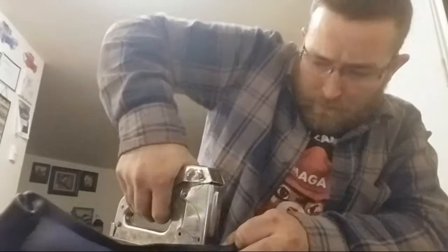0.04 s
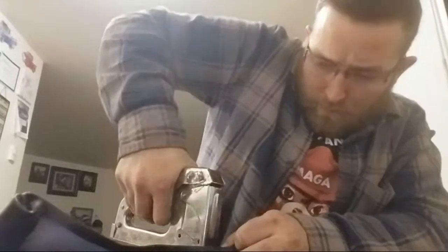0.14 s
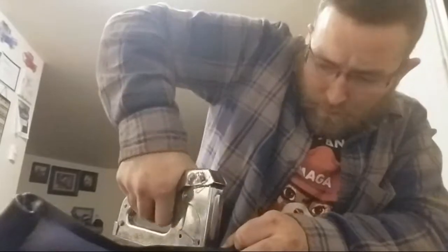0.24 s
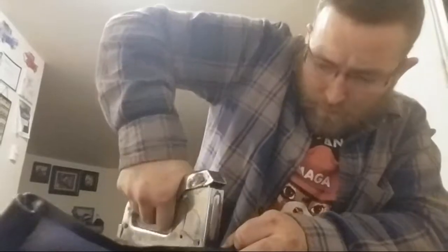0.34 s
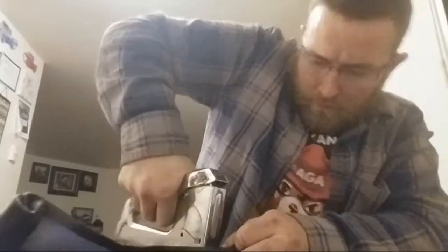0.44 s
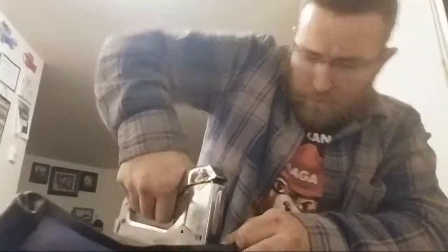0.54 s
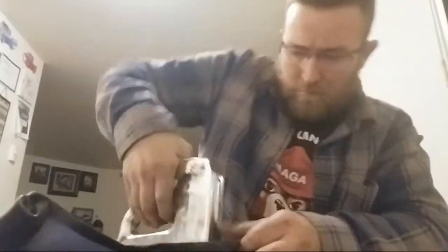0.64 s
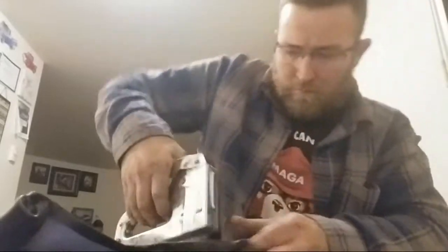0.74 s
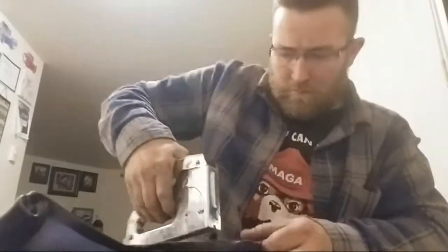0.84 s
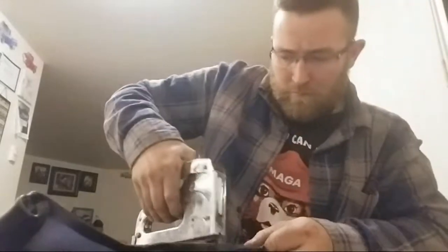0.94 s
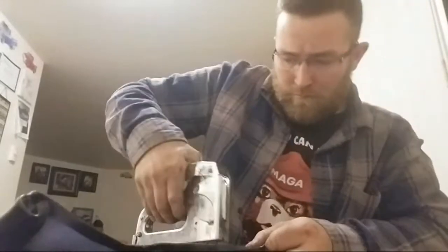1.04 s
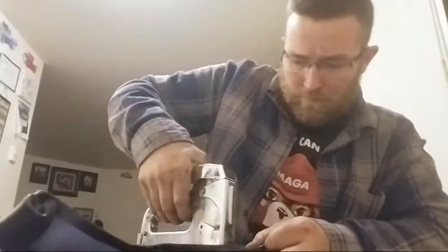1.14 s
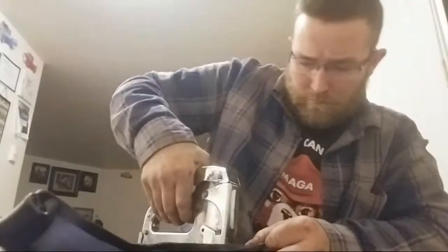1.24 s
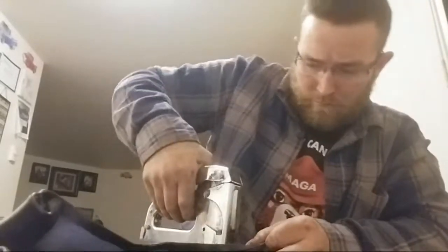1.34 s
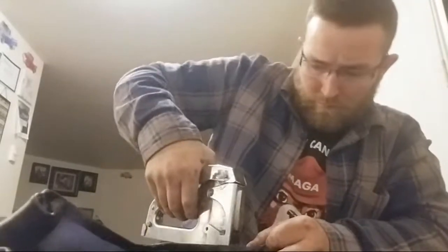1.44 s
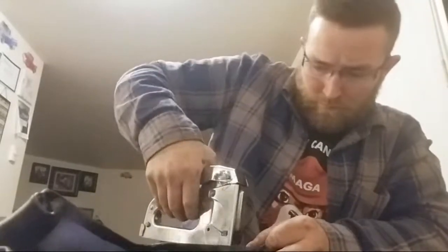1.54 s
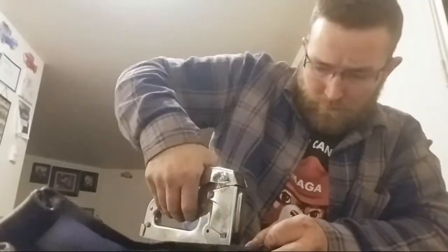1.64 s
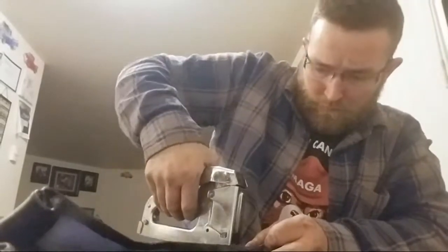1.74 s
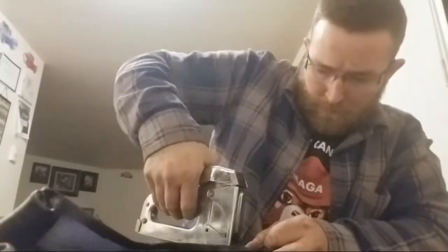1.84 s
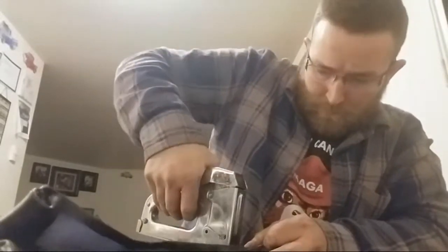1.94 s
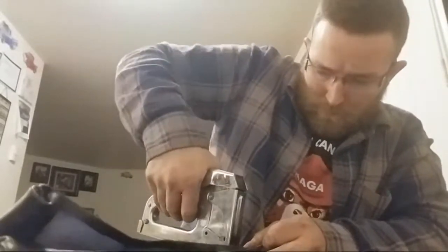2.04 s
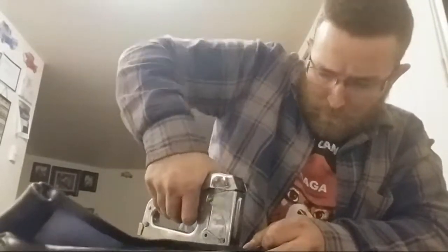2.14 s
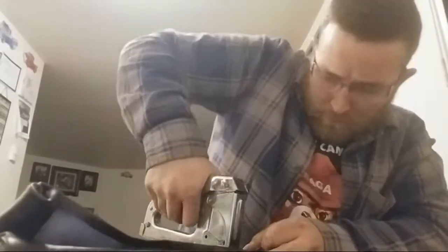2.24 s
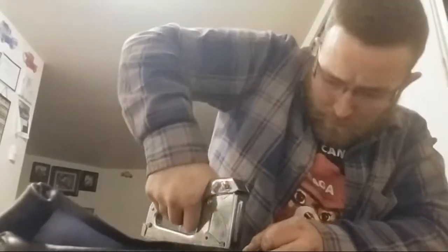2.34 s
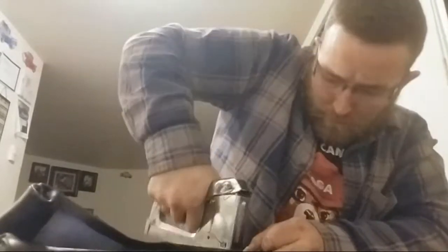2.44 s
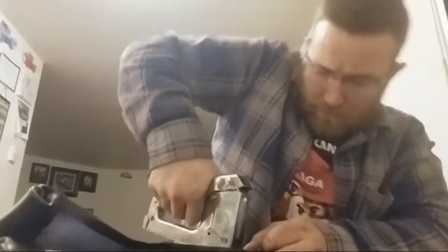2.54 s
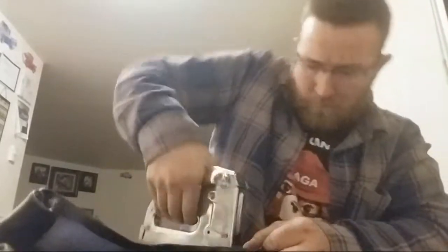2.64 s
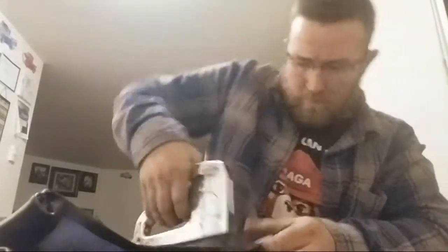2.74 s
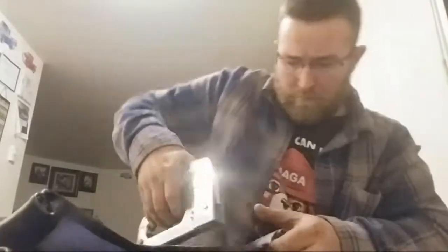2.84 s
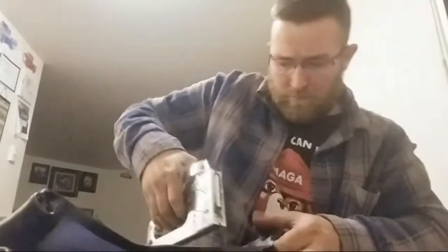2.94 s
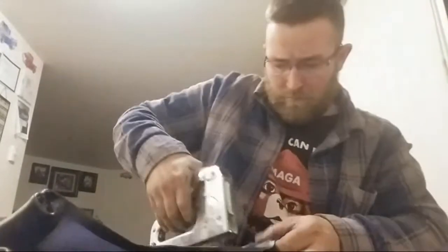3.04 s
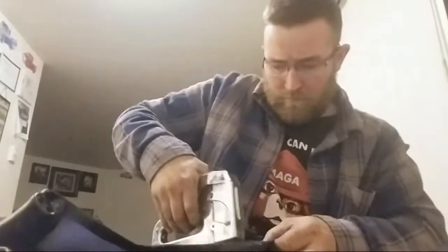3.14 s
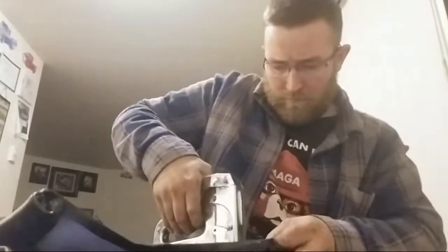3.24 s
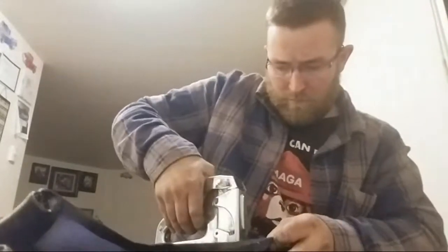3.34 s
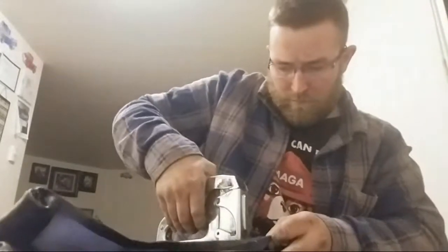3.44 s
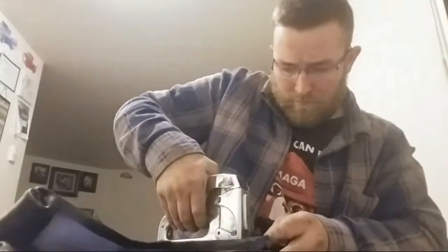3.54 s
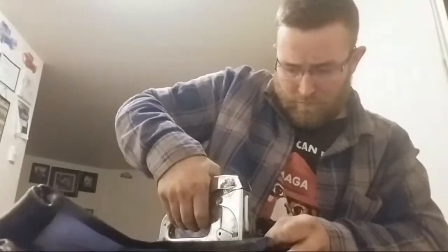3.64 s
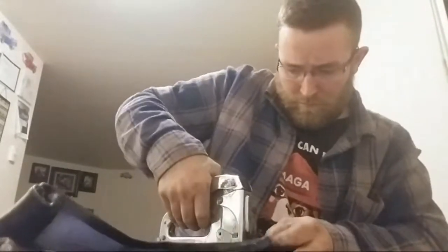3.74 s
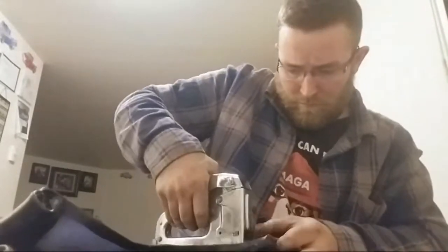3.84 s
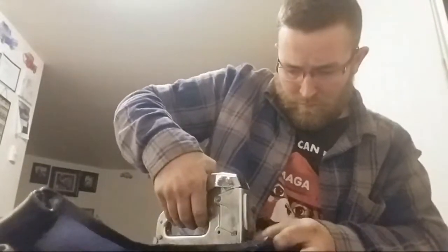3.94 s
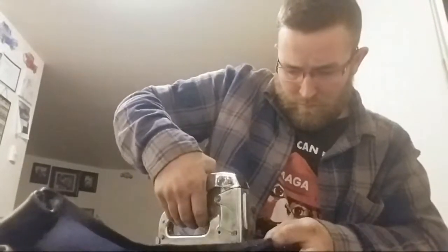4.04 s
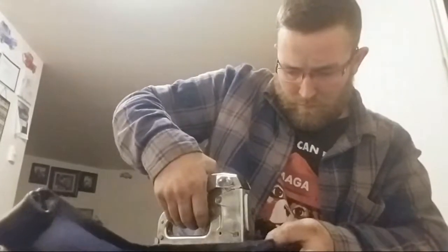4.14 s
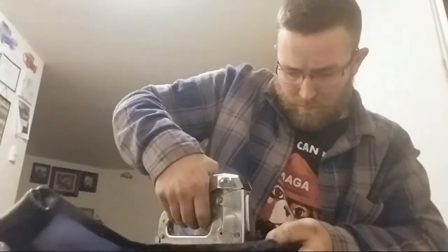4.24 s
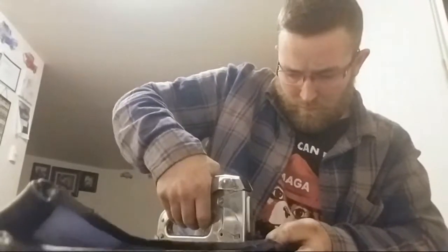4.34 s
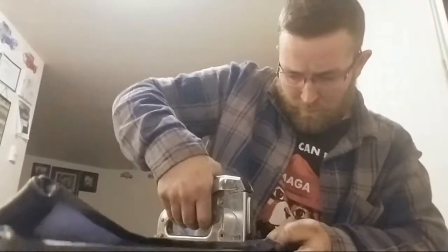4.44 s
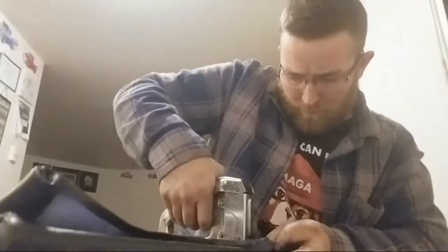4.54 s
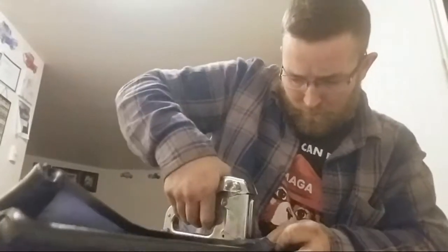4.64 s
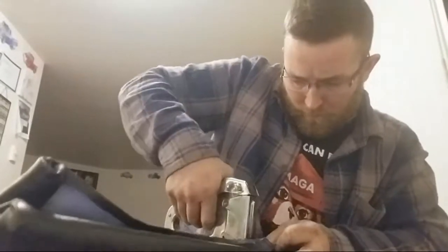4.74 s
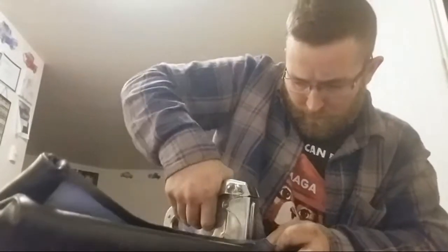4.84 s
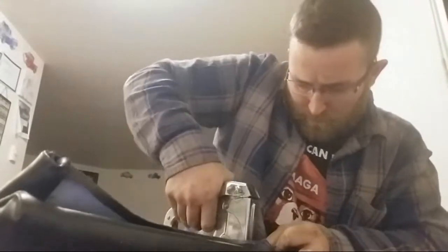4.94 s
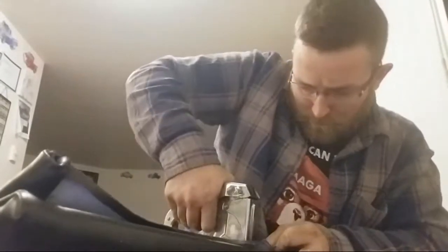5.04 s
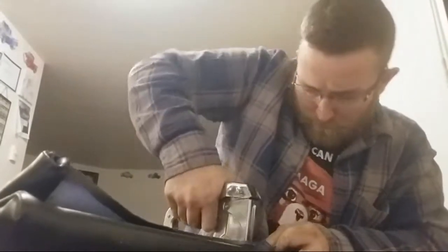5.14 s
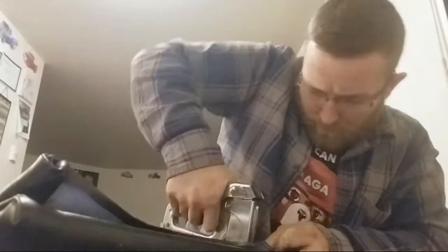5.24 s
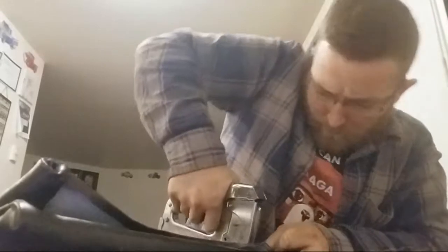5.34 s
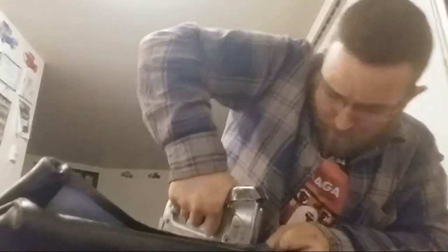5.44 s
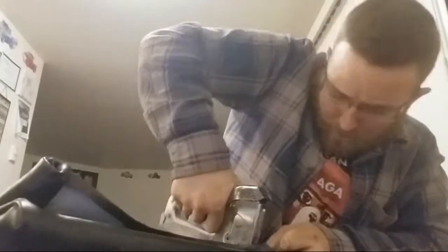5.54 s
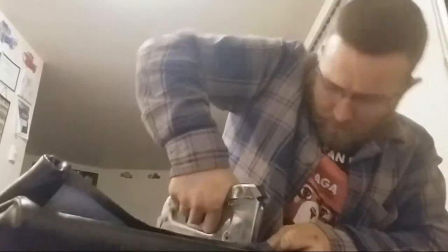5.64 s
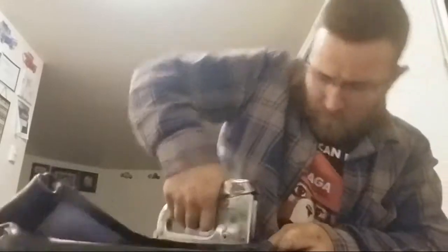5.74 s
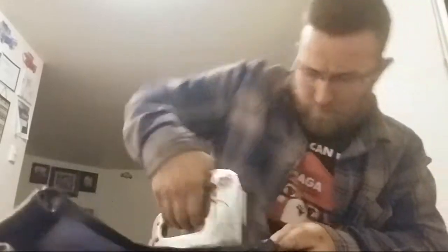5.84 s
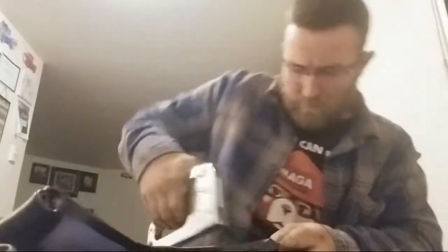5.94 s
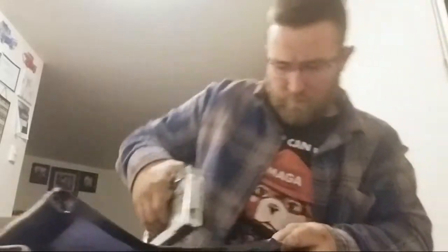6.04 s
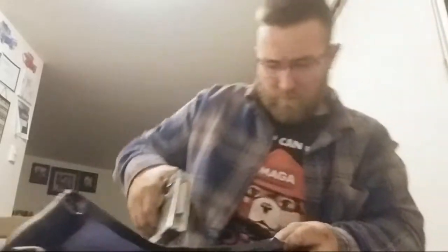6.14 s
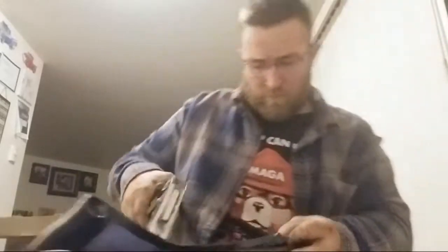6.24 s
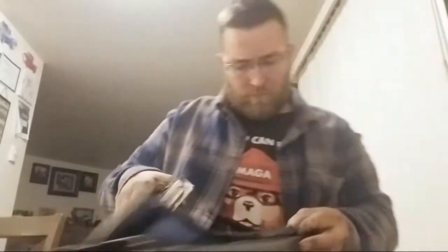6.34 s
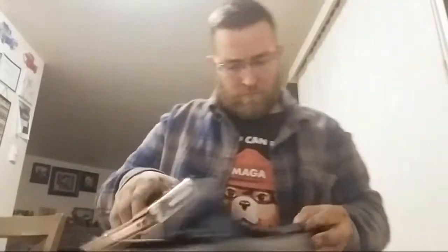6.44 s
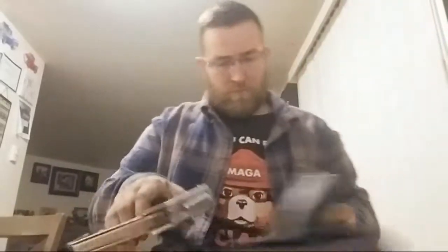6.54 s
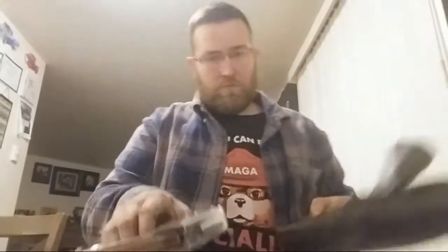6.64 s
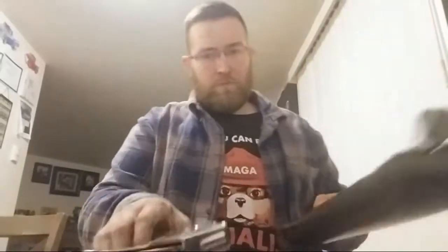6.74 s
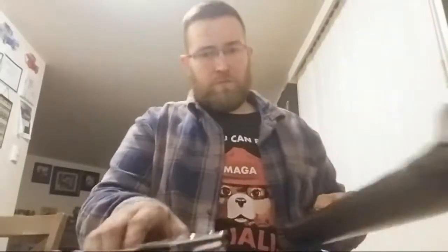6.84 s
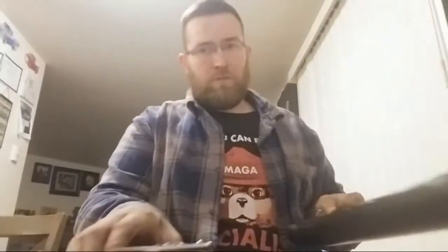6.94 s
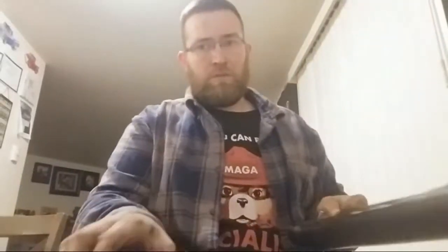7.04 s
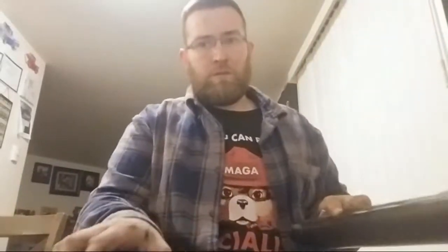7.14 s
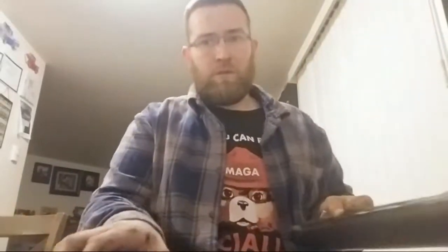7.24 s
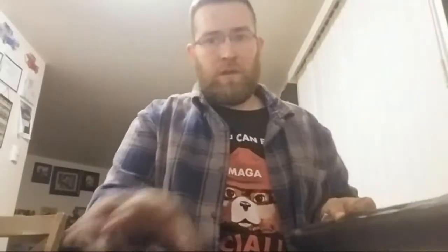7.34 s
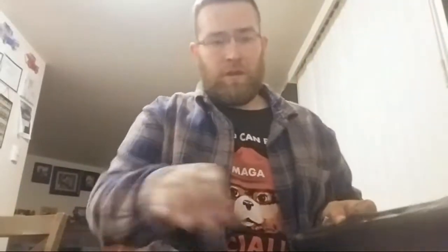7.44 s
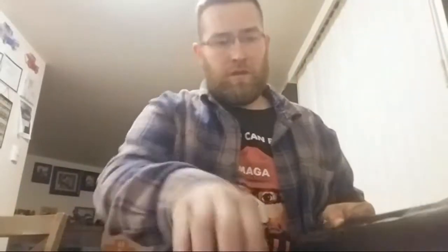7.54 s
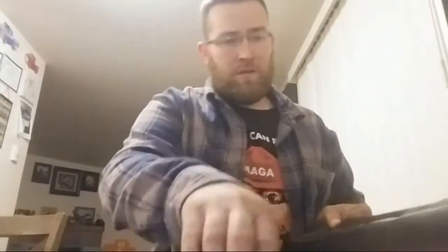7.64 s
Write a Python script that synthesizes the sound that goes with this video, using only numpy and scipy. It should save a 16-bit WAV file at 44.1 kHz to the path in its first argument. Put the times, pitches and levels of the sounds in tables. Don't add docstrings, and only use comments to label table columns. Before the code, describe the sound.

In a small hard room, close to a phone microphone, cloth scrapes briefly, then a staple gun clicks and slams into a board. Its lever springs back with faint clicks. Two more shots follow at intervals, with rustles and faint ticks between. Finally the metal tool lands on a table with hard knocks, then soft rubbing.

```python
import sys
import numpy as np
from scipy import signal
from scipy.io import wavfile
from scipy.ndimage import uniform_filter1d, minimum_filter1d

SR = 44100
rng = np.random.default_rng(int(sys.argv[2]) if len(sys.argv) > 2 else 0)


def persist_wave(psi):
    counts = np.round(np.clip(psi, -1, 1) * 32767).astype(np.int16)
    wavfile.write(sys.argv[1], SR, np.atleast_2d(counts).T)


def attenuation_scalar(level_db):
    decades = np.asarray(level_db, float) / 20
    return 10 ** decades


N = 338850
TREBLE_HZ = 8000

# (time [s], room level [dB], board level [dB], rattle [s], favoured pitch [Hz])
BLOWS = [
    (0.339, -6, -8.5, 0.02, 909.5),
    (2.3723, -7.5, -9, 0.012, 722.5),
    (5.4596, -7.5, -8.5, 0.018, 580),
]
# (frequency [Hz], level [dB], t60 [s])
BOARD = [(115, 0, .26), (147, -7, 0.3), (215.5, -8.5, 0.22), (321, -2, 0.2), (378, -3.5, 0.2),
         (497, -7, .2), (563, -2, 0.18), (616, -3, 0.16), (726, -6, .18), (772, -2.5, 0.17), (856, -5, .15),
         (1203, -11, 0.2), (1840, -7, 0.13), (3050, -17.5, 0.054)]
# (frequency [Hz], level [dB per Hz])
BLOW_COLOUR = [(24, -52), (40, -17), (137, -9.5), (180, -15), (337, -7.5), (896, -14.5), (965, -13.5),
               (1810, -15), (2770, -16), (9940, -20.5), (16000, -18)]


def blows():
    out = np.zeros(N)
    slam_db, treble_db = 9, -11.5
    for s, room_db, board_db, rattle_s, spot_hz in BLOWS:
        driver = [(370.4, -6, .02), (spot_hz, 1.5, 0.015), (1380, -7, .02), (4040, -11.5, 0.0039)]
        add(out, s, attenuation_scalar(slam_db) * ring(driver, 0.022, 0.94, rise_s=.003))
        add(out, s, attenuation_scalar(slam_db - 6) * ring(STEEL, 0.033, 3.7, rise_s=.003))

        struck = favour(BOARD, spot_hz, lift_db=4.0)
        board = ring(struck, 5 * rattle_s, -8.5, rise_s=0.011, rough=0.65, count=18000)
        add(out, s, attenuation_scalar(board_db) * board)

        tail = echo(BLOW_COLOUR, treble_db, shorter=0.72, hold_s=rattle_s, count=440)
        add(out, s, attenuation_scalar(room_db - 0.5) * tail)

        shake = echo(BLOW_COLOUR, -60, shorter=0.87, rise_s=0.82 * rattle_s, hold_s=0.47 * rattle_s, count=440)
        shaken = favour(BOARD, spot_hz, lift_db=7.0)
        rattle = sum(attenuation_scalar(db) * resonate(shake, hz, 39) for hz, db, _ in shaken)
        add(out, s, attenuation_scalar(board_db + 5.0) * rattle)
    return out


# (time [s], peak level [dB], favoured pitch [Hz])
LATCH = [
    (0.306, -7, 990),
    (2.343, -7, 976),
    (5.415, -7, 2310),
    (5.4238, -14.5, 1250),
]
# (frequency [Hz], level [dB], t60 [s])
LATCH_MODES = [(850, -2, .015), (1150, 0, .016), (1500, -2, .012), (1950, -1, .016), (2450, -1, .018),
               (2900, -2, .015), (3500, -6, .01), (4300, -8, .01), (6500, -16, .008)]


def latch_slips():
    treble_db, room_db = -10, -21.5
    events = [(s, db, treble_db, room_db, hz) for s, db, hz in LATCH]
    return steel(events, LATCH_MODES, 0.0045, 0.0086, -16, -2.0)


# (time [s], peak level [dB], treble [dB], room [dB], favoured pitch [Hz])
LEVER = [(0.628, -32.5, -1.5, -10, 3050), (0.649, -28, -9.5, -16.5, 1760), (0.659, -30.5, 5, -32, 3030),
         (2.651, -37, -2, -11.5, 1770), (2.678, -29.5, 3.5, -14.5, 3120),
         (2.687, -32.5, -10.5, -20.5, 3260), (3.684, -40.5, -7, -18, 3140), (4.25, -40, -3, -33, 2950),
         (5.807, -37, -27, -13, 3140), (5.815, -50, 13, -21, 1110), (5.83, -23, 0.5, -19.5, 3080),
         (5.849, -44, 0, -15, 1094), (7.075, -12, -6, -31, 1160), (7.093, -24.5, -1, -38, 1100)]
# (frequency [Hz], level [dB], t60 [s])
LEVER_MODES = [(1250, 2, .035), (1500, -3, .02), (2100, -10, .02), (2750, -5, .012), (3150, 0, .02),
               (3400, -5, .012), (4400, -12, .02), (6200, -16, .015)]


def lever_clicks():
    return steel(LEVER, LEVER_MODES, 0.037, 0.029, -22, -2.0)


# (frequency [Hz], level [dB], t60 [s])
STEEL = [(8650, 0, .03), (9900, -4, .012), (11450, 0, .025), (13000, -4, .012), (15100, -2, .018)]
# (frequency [Hz], level [dB per Hz])
STEEL_ECHO = [(100, -24), (600, -3.5), (1500, -4), (4000, -10), (7000, -15)]


def steel(events, modes, crack_s, treble_crack_s, creep_db, echo_treble_db):
    out = np.zeros(N)
    no_thump = signal.butter(4, 720, "high", fs=SR, output="sos")
    for s, db, treble_db, room_db, spot_hz in events:
        add(out, s - .005, attenuation_scalar(db + creep_db) * ring(modes, 0.01, 2.4, rise_s=0.0065))
        body = ring(favour(modes, spot_hz, lift_db=9), crack_s, -1.8)
        add(out, s, attenuation_scalar(db + 1) * signal.sosfilt(no_thump, body))
        add(out, s, attenuation_scalar(db + treble_db + 7.0) * ring(STEEL, treble_crack_s, 5.6))
        tail = attenuation_scalar(db + room_db) * echo(STEEL_ECHO, treble_db + echo_treble_db, shorter=.7)
        plates = resonate(tail, 8650, 300) + .7 * resonate(tail, 11450, 400)
        add(out, s, tail + attenuation_scalar(3.0) * plates)
    return out


# (time [s], peak level [dB], contact pitch [Hz], thump level [dB], thump pitch [Hz])
KNOCKS = [
    (3.762, -41, 880, -19.5, 332),
    (5.699, -30, 1830, -12, 551),
    (7.07, -2.5, 1790, -31.5, 501),
    (7.088, -20.5, 1040, -6, 142.4),
    (7.149, -15.5, 1220, -21, 220),
    (7.268, -7, 1120, -16, 309),
]


def table_knocks():
    return knocks(KNOCKS, 0.00013, 0.011, -21.5)


# (time [s], peak level [dB], contact pitch [Hz], thump level [dB], thump pitch [Hz])
BUMPS = [(0.68, -45, 590, -13.5, 135), (5.85, -65, 396, 3, 153), (0.81, -44.5, 604, -16, 146),
         (0.934, -55.5, 576, -15, 161), (4.962, -46, 520, -30, 320), (5.322, -29.5, 1020, -19, 130),
         (6.894, -48.5, 412.3, -6.5, 265.4), (7.007, -45.5, 755, -10, 255), (7.562, -32, 550, -16, 148),
         (7.604, -41.5, 580, -4, 130)]


def soft_bumps():
    return knocks(BUMPS, 0.0074, 0.1, -13)


# (time [s], peak level [dB], thump pitch [Hz])
TICKS = [(1.1011, -50.5, 805), (1.3584, -66, 386), (1.4731, -58.5, 309), (1.5648, -57, 340),
         (1.5968, -48.5, 321), (1.956, -46, 311), (2.235, -44.5, 958), (2.2576, -47, 818),
         (2.2757, -47.5, 883), (3.6253, -55.5, 970)]


def nose_ticks():
    contact_hz, thump_db = 2240, -19.5
    events = [(s, db, contact_hz, thump_db, hz) for s, db, hz in TICKS]
    return knocks(events, 0.0008, 0.0061, -19.5)


# (frequency [Hz], level [dB per Hz])
WOOD_ECHO = [(50, -21.5), (130, 0), (400, -4.5), (1000, -9.5), (2500, -22.5), (7000, -44)]


def knocks(events, rise_s, contact_s, room_db):
    out = np.zeros(N)
    for s, db, hz, thump_db, low_hz in events:
        tick_modes = [(hz * 0.5, -3, .02), (hz, 0, .018), (hz * 1.2, -3, .015), (hz * 1.8, -7, .011)]
        dull = signal.butter(2, hz * 2.0, fs=SR, output="sos")
        tick = signal.sosfilt(dull, ring(tick_modes, contact_s, 0.3, rise_s))
        add(out, s, attenuation_scalar(db + 3.0) * tick)

        wood_modes = [(low_hz * .5, -9, .25), (low_hz, 0, .15), (low_hz * 2.0, -4, .06)]
        thump = ring(wood_modes, contact_s, -15.5, rise_s, rough=0.19, count=12000)
        add(out, s, attenuation_scalar(db + thump_db + 13) * thump)

        add(out, s, attenuation_scalar(db + room_db) * echo(WOOD_ECHO, -34.5, shorter=0.84, rise_s=0.0043))
    return out


# (time [s], length [s], level [dB], resonance [Hz])
DRAGS = [(0.076, 0.081, -35.5, 1040), (1.199, 0.097, -61, 1680), (1.889, 0.049, -39, 1000),
         (2.1, 0.17, -47, 876), (3.799, 0.086, -40, 1030), (4.359, 0.14, -32, 1100),
         (4.683, 0.13, -32, 1130), (4.939, 0.08, -40, 1060), (6.628, 0.14, -53, 1150),
         (6.9, .07, -44.5, 4470), (7.355, 0.028, -35.5, 4950), (7.47, 0.14, -31, 2664),
         (7.591, 0.11, -40, 2720), (7.62, 0.09, -36, 1510)]
# (ratio [1], level [dB])
DRAG_OVERTONES = [(1, -17.5), (2.25, -39), (3.4, -28.5)]


def drags():
    out = np.zeros(N)
    for s, long, db, hz in DRAGS:
        grit = rng.standard_normal(SR // 3) * attenuation_scalar(0.76 * drift(SR // 3, 200))
        sound = 0
        for ratio, overtone_db in DRAG_OVERTONES:
            if hz * ratio < TREBLE_HZ:
                hollow = resonate(resonate(grit, hz * ratio, 250), hz * ratio, 250)
                sound = sound + attenuation_scalar(overtone_db) * evened(hollow)
        count = round(long * SR)
        add(out, s, attenuation_scalar(db) * sound[:count] * signal.windows.tukey(count, .6))
    return out


# (time [s], length [s], level [dB])
SPRING = [
    (.95, .2, -71),
    (2.749, 0.46, -51.5),
    (5.9, 0.49, -57),
]


def spring_whistle():
    out = np.zeros(N)
    for s, long, db in SPRING:
        u = np.arange(round(long * SR)) / (long * SR)
        pitch_hz = 4350 + 14 * drift(SR, 300)
        whistle = np.sin(2 * np.pi * np.cumsum(pitch_hz) / SR)[:len(u)]
        whistle = whistle * attenuation_scalar(2.6 * drift(len(u), 900))
        swell = np.minimum(u / .11, 1) ** 2 * np.minimum((1 - u) / .4, 1)
        add(out, s, attenuation_scalar(db - 30 * u ** .5) * swell * whistle)
    return out


# (frequency [Hz], level [dB per Hz])
HUM_COLOUR = [(24, -60.5), (40, -17), (159, -5), (262, -8), (320, -3.5), (646, -5), (1040, -6), (1480, -14),
              (4570, -13.5), (7730, -27), (9220, -22.5), (14800, -26.5), (16000, -31.5)]
# (frequency [Hz], width [Hz], level [dB])
HUM_PEAKS = [(74, 32, -15.5), (330.6, 12, -5), (480, 30, -12.5), (1030, 82, -7.5), (1720, 140, -9.5)]


def hum():
    hz, t = np.fft.rfftfreq(1024, 1 / SR), np.arange(N // 256 + 5) * 256 / SR
    colour = read(HUM_COLOUR, hz)
    band = np.digitize(hz, [1500, TREBLE_HZ])
    band_db = [10 * np.log10(np.sum(attenuation_scalar(2 * colour[band == k]))) for k in range(3)]
    colour -= np.array(band_db)[band]
    levels = hum_levels(t)
    level = uniform_filter1d(levels[band], 9, axis=0)
    level = level + (band == 2)[:, None] * rustle(t)
    patch_db = np.where(band < 2, 2.1, 1.3)[:, None]
    field = colour[:, None] + level + patch_db * drift(level.shape, 8, 8) + 0.99 * drift(len(t), 3)
    flat = noise(0 * field[:, :200], count=40000)
    air = noise(field, count=N) / np.std(flat) * np.sqrt(len(hz))
    low_db = np.interp(np.arange(N) / SR, t, levels[0])
    for f, width, db in HUM_PEAKS:
        wander_hz = f * (1 + 0.0052 * drift(N, 6000))
        tone = evened(resonate(rng.standard_normal(N), wander_hz, width))
        air = air + tone * attenuation_scalar(db + low_db + 0.4 * drift(N, 3000))
    return air


# (open level [dB], ducked by [dB], share of handling [1])
HUM_RANGES = [
    (-54, 20.3, 0.96),
    (-59, 18.5, 0.56),
    (-60.5, 20, .4),
]
# (time [s], lift [dB])
HANDLING = [(0.0, -0.5), (1.7, 4), (2.2, 1.5), (3.2, 1.8), (3.95, 7), (4.25, 1.8), (4.65, 3), (5.2, 0.2),
            (6.0, 2.8), (6.3, 4.7), (6.5, 0), (7.0, 4.8), (7.22, 6.5), (7.4, 3), (7.68, 5.5)]


def hum_levels(t):
    fall_s, hold_s, recover_s = 0.22, 1.129, 0.31
    since = t - np.array(BLOWS)[:, :1]
    sink = 1 - np.exp(-(np.maximum(since, 0) / (2 * fall_s)) ** 3)
    recovery = np.exp(-np.maximum(since - hold_s, 0) / recover_s)
    ducked = (sink * recovery).max(0)
    lift = np.interp(t, *np.transpose(HANDLING))
    return np.array([open_db - duck_db * ducked + share * lift for open_db, duck_db, share in HUM_RANGES])


# (time [s], length [s], lift [dB])
RUSTLES = [
    (1.5, 0.12, 4.5),
    (2.06, .2, 2),
    (6.19, 0.1, 9),
    (6.39, 0.065, 10),
    (7.21, 0.06, 7.5),
    (7.255, 0.065, 6),
]


def rustle(t):
    lifts = 0
    for s, long, db in RUSTLES:
        lifts = lifts + db * np.clip(np.minimum(t - s, s + long - t) / 0.02, 0, 1)
    return lifts + 2.3 * drift(len(t), 6)


# (frequency [Hz], t60 [s])
ROOM = [(60, 0.11), (250, 0.49), (700, 0.38), (1500, 0.51), (4000, 0.6), (9000, 0.43), (12000, 0.4),
        (16000, 0.19)]


def echo(colour, treble_db, shorter=1., rise_s=0.0047, hold_s=0, count=280):
    hz, t = np.fft.rfftfreq(256, 1 / SR)[:, None], np.arange(count) * 64 / SR
    level = np.where(hz < TREBLE_HZ, read(colour, hz), treble_db)
    t60 = shorter * read(ROOM, np.minimum(hz, TREBLE_HZ * 1.6))
    fade = 60 * np.maximum(t - hold_s, 0) / t60
    tail = noise(level - fade + 2.4 * drift((129, count), 3, 8), count=None)
    rise = np.minimum(np.arange(len(tail)) / (rise_s * SR), 1)
    close = np.minimum(np.linspace(5, 0, len(tail)), 1)
    return tail / np.std(tail[:1000]) * rise * close


def ring(modes, crack_s, crack_db, rise_s=0.0015, rough=0.32, count=5000):
    t = np.arange(count) / SR
    rise = np.minimum(t / rise_s, 1) ** 2
    contact = rng.standard_normal(len(t)) * attenuation_scalar(-60 * t / crack_s) * rise
    body = sum(attenuation_scalar(db - 60 * t / t60) * np.sin(2 * np.pi * (hz * t + rng.random())) for hz, db, t60 in modes)
    chatter = signal.fftconvolve(contact, body)[:len(t)]
    rung = body * rise / np.std(body) + rough * chatter / np.std(chatter)
    edges = 0.99 * min(modes)[0], 0.99 * max(modes)[0]
    crack = signal.sosfilt(signal.butter(4, edges, "band", fs=SR, output="sos"), contact)
    sound = rung / abs(rung).max() + attenuation_scalar(crack_db) * crack / abs(crack).max()
    sound = sound * np.minimum(np.linspace(5, 0, count), 1)
    return sound / abs(sound).max()


def favour(modes, spot_hz, lift_db=8):
    width = .25
    return [(hz, db + lift_db * np.exp(-(np.log(hz / spot_hz) / width) ** 2), t60) for hz, db, t60 in modes]


def resonate(x, hz, width):
    turn = np.exp(2j * np.pi * np.cumsum(hz * np.ones(len(x))) / SR)
    r = np.exp(-np.pi * width / SR)
    return 2 * (turn * signal.lfilter([1 - r], [1, -r], x / turn)).real


def noise(field_db, count):
    z = rng.standard_normal(field_db.shape) + 1j * rng.standard_normal(field_db.shape)
    size = 2 * (len(z) - 1)
    return signal.istft(z * attenuation_scalar(field_db), nperseg=size, noverlap=size * 3 // 4)[1][:count]


def drift(shape, *spans):
    x = rng.standard_normal(shape)
    for k, span in enumerate(spans):
        x = uniform_filter1d(uniform_filter1d(x, span, axis=k), span, axis=k)
    return evened(x)


def evened(x):
    return x / np.sqrt(np.mean(x ** 2) + 1e-20)


def read(points, hz):
    f, value = np.transpose(points)
    return np.interp(np.log(hz + 1), np.log(f + 1), value)


def add(mix, s, sound):
    part = mix[round(s * SR):][:len(sound)]
    part += sound[:len(part)]


def scene():
    gun = blows() + latch_slips() + lever_clicks()
    wood = table_knocks() + soft_bumps() + nose_ticks()
    return (gun + wood + drags() + spring_whistle() + hum())[None]


def band_limit(x):
    return signal.sosfilt(signal.butter(12, 16970, fs=SR, output="sos"), x)


def record(dry):
    ceiling_db, release_db_per_s, grip = -13, 602, .75
    power_db = 10 * np.log10(abs(uniform_filter1d(dry[0] ** 2, 450)) + 1e-12)
    ahead = round(.003 * SR)
    power_db = -minimum_filter1d(-power_db, ahead, origin=-(ahead // 2))
    fall = np.arange(N) * release_db_per_s / SR
    held_db = np.maximum.accumulate(power_db + fall) - fall
    over_db = np.maximum(held_db - ceiling_db, 0)
    held = 0.95 * np.tanh(dry / attenuation_scalar(grip * uniform_filter1d(over_db, 60)) / 1.013)
    band_edge = signal.firwin(511, 15900, window=("kaiser", 4), fs=SR)
    cut = signal.oaconvolve(held, band_edge[None], "same")
    cut = cut + attenuation_scalar(-40) * held
    mix = signal.sosfilt(signal.butter(4, 58, "high", fs=SR, output="sos"), cut)
    return band_limit(mix)


dry = scene()
out = record(dry)
persist_wave(out)
```